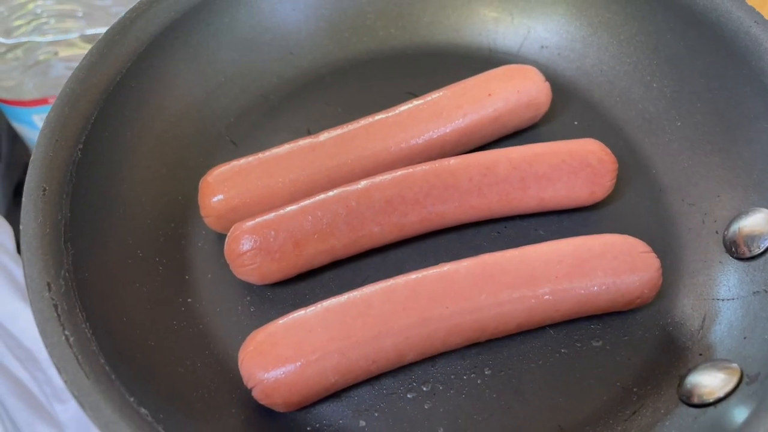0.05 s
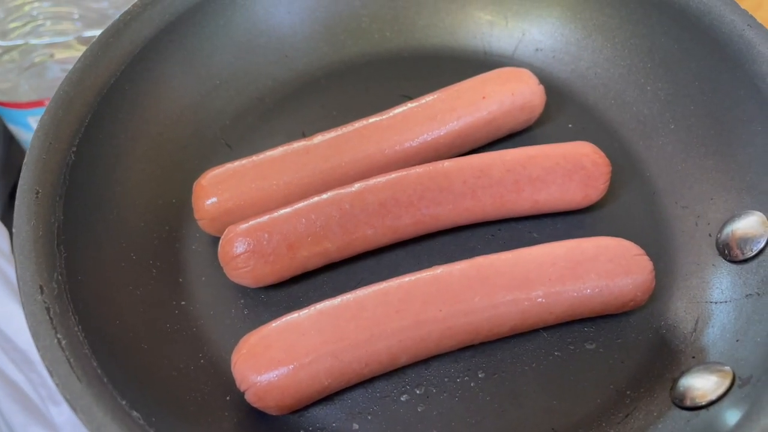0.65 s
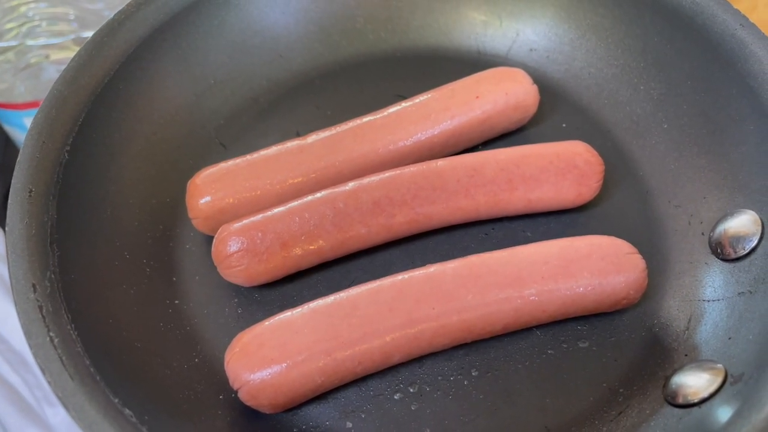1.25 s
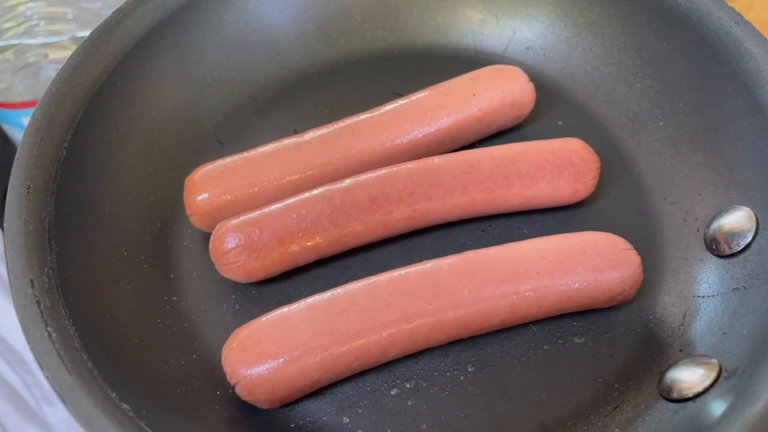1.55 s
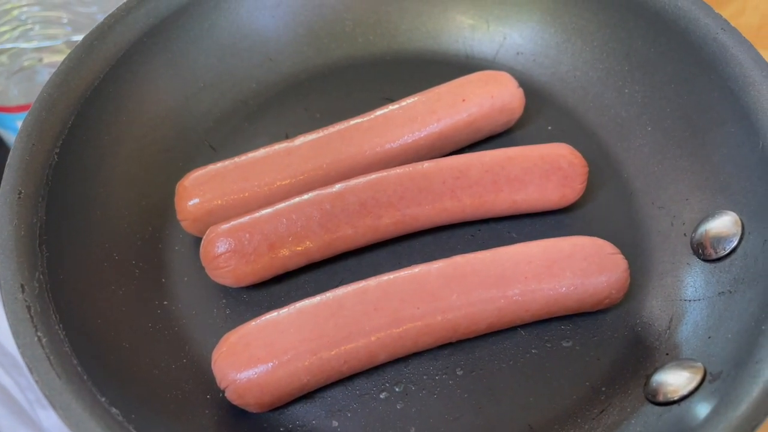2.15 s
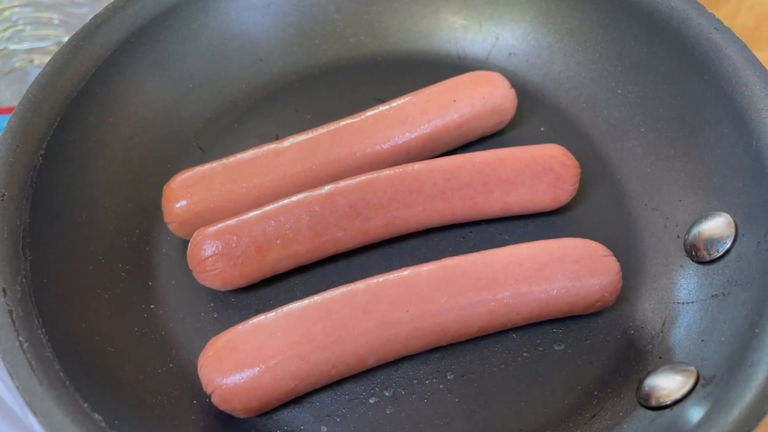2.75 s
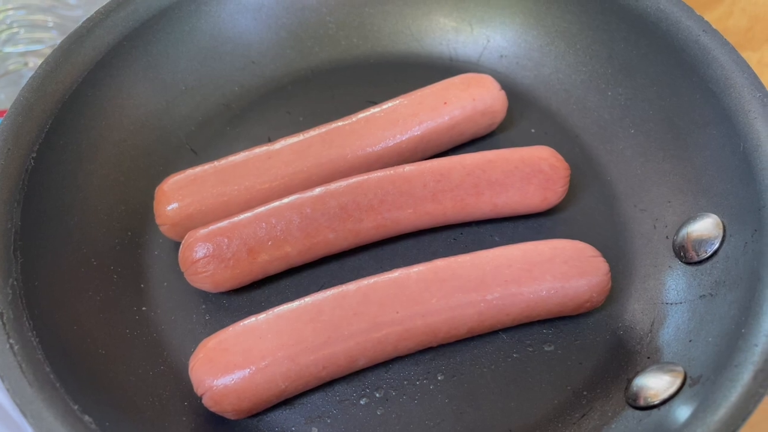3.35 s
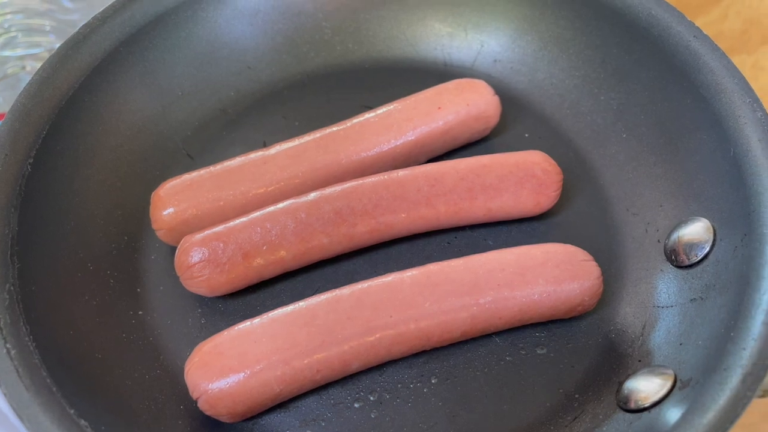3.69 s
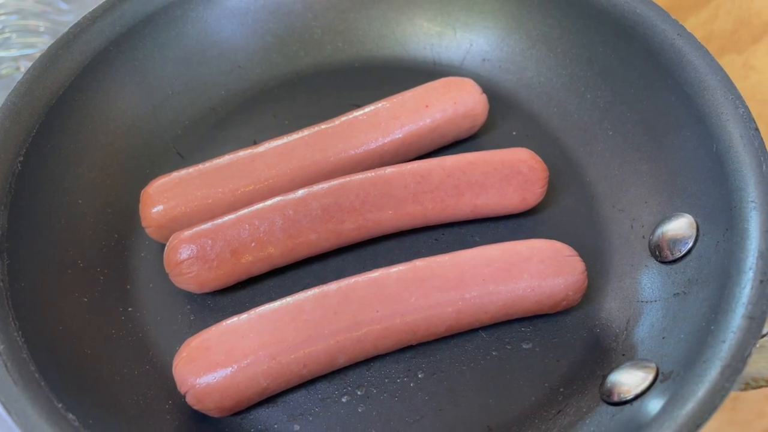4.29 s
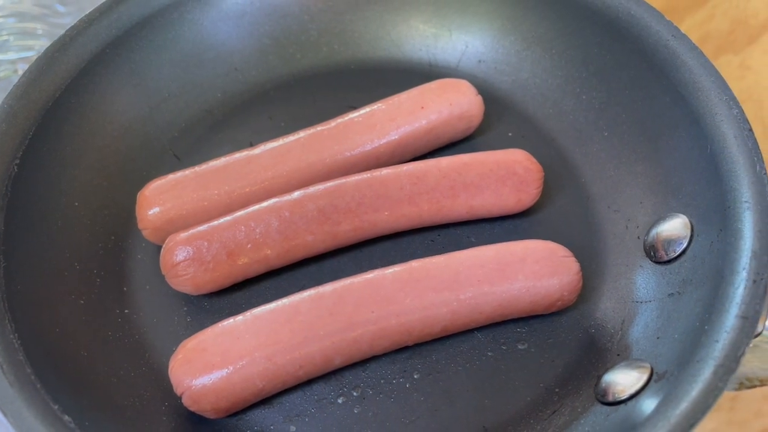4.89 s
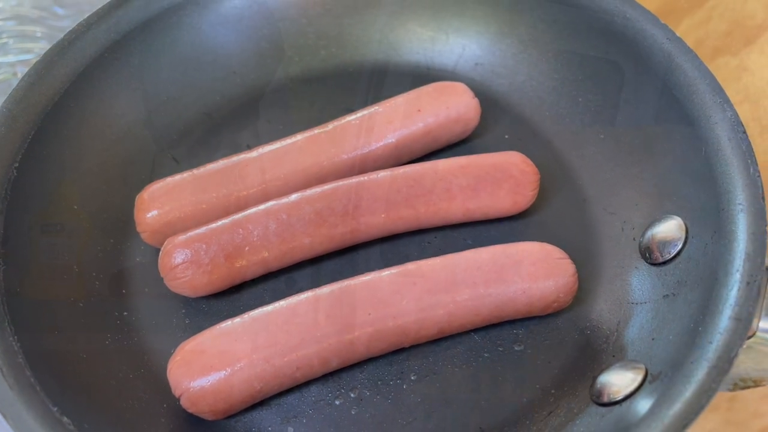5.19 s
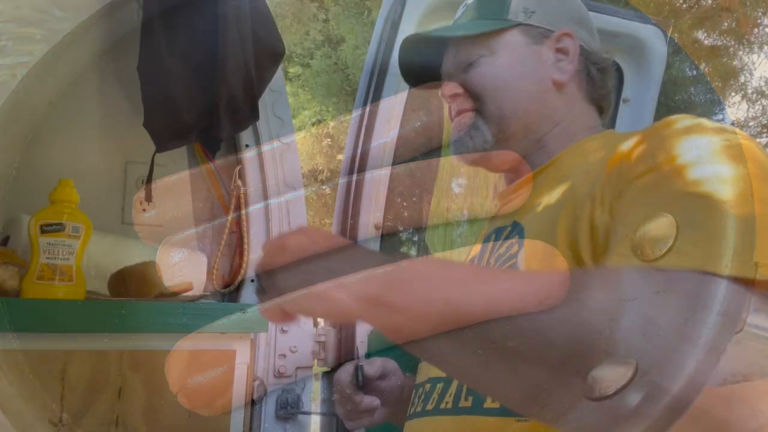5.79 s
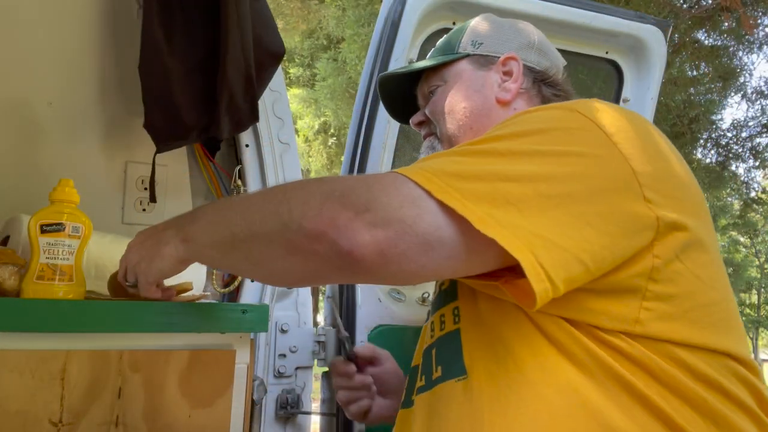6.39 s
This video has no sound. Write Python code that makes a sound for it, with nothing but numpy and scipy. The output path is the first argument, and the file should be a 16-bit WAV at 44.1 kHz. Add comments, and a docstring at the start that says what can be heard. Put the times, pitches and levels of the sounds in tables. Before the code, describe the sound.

Outdoors, a gas camp stove roars steadily under a close frying pan of fizzing, popping sausages, while a low hum slowly dies away. A breeze builds into low, irregular thumps on the microphone. In the last second the frying dissolves, a single dull utensil tap sounds, and what remains is the more distant burner with faint trilling crickets.

```python
"""Sausages sizzle in a frying pan on a camp stove outdoors, heard from just above the pan. Bursting steam
bubbles excite the pan's resonances, and drops of water flash to steam in sharp spits. Turbulent
combustion roars beneath, a low hum slowly fades and a breeze buffets the microphone. Near the end a
utensil knocks as the sound dissolves to a spot beside a van, where the stove is softer and crickets
trill in the trees."""
import sys
import numpy as np
from scipy import signal
from scipy.fft import rfft, irfft
from scipy.io import wavfile
from scipy.ndimage import uniform_filter1d

SR = 44100
rng = np.random.default_rng(int(sys.argv[2]) if len(sys.argv) > 2 else 0)


def dump_mix(stems):
    """Bounce the given channels to the path in sys.argv[1] as a 16-bit WAV at rate SR."""
    frames = np.atleast_2d(stems).T  # one column per channel
    limited = np.clip(frames, -1, 1)  # hard clip at full scale
    pcm = np.round(limited * 32767).astype(np.int16)
    wavfile.write(sys.argv[1], SR, pcm)


N = 284004
T = np.arange(N) / SR
HZ = np.maximum(np.arange(N // 2 + 1) * SR / N, 1)
TOP_HZ = 15550  # upper band limit


def undb(db):
    """Amplitude ratio of a level in decibels."""
    return 10 ** (np.asarray(db) / 20)


def over_hz(table):
    """Interpolation of a table to every bin, on a logarithmic frequency axis."""
    hz, value = np.transpose(table)
    return np.interp(np.log(HZ), np.log(hz), value)


def colour(x, table):
    """Minimum-phase filtering: folding the cepstrum makes a (f/Hz, gain/dB) response causal."""
    cepstrum = irfft(np.log(undb(over_hz(table))), N)
    cepstrum[1:N // 2] *= 2
    cepstrum[N // 2 + 1:] = 0
    return irfft(rfft(x) * np.exp(rfft(cepstrum)), N)


def level(x, db):
    """Normalisation to an rms level."""
    return x * undb(db) / np.sqrt(np.mean(x ** 2))


def lean(x, db):
    """Level difference between channels: left exceeds right by db."""
    return x * undb(np.array([[db], [-db]]) / 2)


def ramp(start_s, length_s):
    """Linear rise from 0 to 1."""
    return np.clip((T - start_s) / length_s, 0, 1)


def walk(rate_hz):
    """Slow random fluctuation: low-pass Gaussian noise of unit rms."""
    return level(irfft(rfft(rng.standard_normal(N)) * np.exp(-(HZ / rate_hz) ** 2), N), 0)


def stereo_noise(side_db, apart_hz):
    """Partial coherence: the channels are alike in the bass and uncorrelated above apart_hz."""
    mid, side = rng.standard_normal((2, N))
    side = irfft(rfft(side) * np.minimum(undb(side_db) + HZ / apart_hz, 1), N)
    return np.array([mid + side, mid - side])


# Phase lead of the microphone's left port over its right: f/Hz, phase/rad
PORT_LEAD = [(100, 0), (1700, .4), (2100, .9), (3300, .9), (3900, .2), (5300, .9), (6200, -.4),
             (7000, -1.4), (7700, -2.9), (8900, -3.4), (9650, -4.6), (10900, -6.2), (12400, -6.4),
             (13100, -7.7), (13800, -8.8), (14500, -9.4), (15700, -9.5)]
# Level of the left port relative to the right: f/Hz, level/dB
PORT_LEVEL = [(500, -1), (1500, 3), (2500, 4.5), (4000, 2.5), (6000, 3), (7600, 0)]


def ports(x):
    """Phase and level differences: the pan's sound reaches the two microphone ports out of step."""
    half = undb(over_hz(PORT_LEVEL) / 2) * np.exp(.5j * over_hz(PORT_LEAD))
    return irfft(rfft(x) * np.array([half, 1 / half]), N)


def bursts(per_s, spread_db, cap_db):
    """Poisson process: steam bubbles burst independently, very many small and a few large."""
    size_db = np.minimum(spread_db * rng.exponential(size=N), cap_db)
    return (rng.random(N) < per_s / SR) * undb(size_db) * rng.choice([-1, 1], N)


def scatter(clicks, decay_s, wall_db, size=600, shared_above_hz=6800):
    """Scattering: each click arrives directly, then as a short smear from the pan's wall."""
    tails = rng.standard_normal((3, size)) * np.exp(-T[:size] / decay_s)  # left, right, shared
    tails = rfft(tails * undb(wall_db) / np.sqrt(np.sum(tails ** 2, axis=1, keepdims=True)), N)
    unshared = .2 + .8 / (1 + (HZ / shared_above_hz) ** 20)
    response = 1 + np.sqrt(unshared) * tails[:2] + np.sqrt(1 - unshared) * tails[2]
    # the wall spreads the energy in time without adding any
    response /= np.sqrt(uniform_filter1d(np.abs(response) ** 2, size=3000, axis=1))
    return irfft(rfft(clicks) * response, N)


# Modes of the pan: f/Hz, half-width/Hz, level/dB
PAN_MODES = [(960, 50, -3), (1470, 70, 1), (1640, 60, -1), (2580, 60, 1), (2770, 60, -.5), (3060, 130, -4),
             (3700, 260, -5), (4800, 140, -8), (5350, 180, -4), (7400, 250, -9)]


def pan_ring(x):
    """Modal resonance: the pan answers each pop at its natural frequencies."""
    modes = sum(undb(db) / (1 + 1j * (HZ - hz) / width) ** 2 for hz, width, db in PAN_MODES)
    return irfft(rfft(x) * modes, N)


def boil(steady_db=1.5, cool_db=-2, warm_up_s=.44, surge_db=.88):
    """Exponential approach to a steady state: the gain rises as the fat heats, with random surges."""
    return undb(steady_db + cool_db * np.exp(-T / warm_up_s) + surge_db * walk(2))


# Spectrum of the crackling fat as the pan colours it: f/Hz, level/dB
FAT_SPECTRUM = [(400, -24), (1000, -7), (1500, -.3), (1850, -8), (2220, -4.2), (2380, -5), (2600, -2.2),
                (3200, -2.6), (3700, -1.4), (4400, -3.2), (5300, -3.5), (6900, -3), (8200, -5.2),
                (9600, -4.4), (12000, -6), (13000, -7.3), (14400, -8), (15500, -11)]


def sizzle(bubble_sizes=10):
    """Shot noise: bubbles fizz at a pitch set by size, bursting films tick, and both ring the pan."""
    pitches = np.geomspace(1100, 14000, bubble_sizes)
    bands = np.exp(-(np.log2(HZ / pitches[:, None]) / .6) ** 2) + 1e-3
    bands /= np.sqrt(np.sum(bands ** 2, axis=0))
    fizz = 0
    for hz, band in zip(pitches, bands):
        per_s = (1500 + .12 * hz) * undb(1.1 * walk(35))  # small, high bubbles are the most numerous
        pops = level(bursts(per_s, spread_db=4.2, cap_db=15.5), 0)
        fizz += scatter(irfft(rfft(pops) * band, N), decay_s=.0007, wall_db=-.5)
    ticks = 0
    for _ in range(3):
        films = bursts(450 * undb(1.4 * walk(25)), spread_db=4.2, cap_db=14)
        ticks += scatter(films, decay_s=.0005, wall_db=0)
    fat = level(fizz, 0) + level(ticks, -5)
    crackle = level(colour(fat, FAT_SPECTRUM), -18.8)
    ringing = level(pan_ring(fat), -36.8)
    return ports(crackle + ringing) * boil()


def squeaks(count=900, size=1500):
    """Damped oscillation: steam squeezing out from under the skins makes tiny gliding tones."""
    out, t = np.zeros((2, N + size)), T[:size]
    for when, pitch, length, glide, loud, side in rng.random((count, 6)):
        hz, decay_s = 2400 * 4.5 ** pitch, .0015 * 4 ** length
        phase = 2 * np.pi * hz * t * (1 + 3 * (glide - .5) * t)
        ring = np.sin(phase) * np.exp(-t / decay_s)
        i = int(when * N)
        out[:, i:i + size] += lean(ring, 8 * (side - .4)) * undb(3.4 * loud ** 3)
    return ports(level(out[:, :N], -31.5))


# Spectrum of the flame at first, from where the microphone starts over the pan: f/Hz, level/dB
EARLY_FLAME_SPECTRUM = [(50, -18), (105, -6), (145, -0.5), (228, -6.5), (290, -5), (345, -6), (420, 0),
                        (510, -1.2), (610, -7.5), (740, -6.5), (820, -15.5), (950, -11), (1120, -19),
                        (1600, -17.5), (2000, -31), (6000, -105)]
# Spectrum of the flame once the microphone has drifted over the pan: f/Hz, level/dB
LATE_FLAME_SPECTRUM = [(50, -19.5), (110, -8), (160, 1.7), (235, -5.5), (290, -4), (345, -5),
                       (440, -3.5), (520, -3), (600, -4.5), (710, -5.5), (820, -13.5), (950, -11.5),
                       (1150, -16), (1600, -15), (2000, -37.5), (6000, -95)]


def flame():
    """Combustion noise: turbulent gas excites the gap under the pan; its colour shifts as the microphone drifts
    over the pan, then the roar eases."""
    gas = stereo_noise(side_db=-18.5, apart_hz=14000)
    early = level(colour(gas, EARLY_FLAME_SPECTRUM), -15.5)
    late = level(colour(gas, LATE_FLAME_SPECTRUM), -15)
    drifted = ramp(start_s=.49, length_s=.55)
    roar = (1 - drifted) * early + drifted * late
    ease_db = -ramp(start_s=2.32, length_s=.32)
    flutter_db = .5 * walk(14)
    return lean(roar, -.77) * undb(ease_db + flutter_db)


def hum(hz=53.8, base_db=-20.5, fall_db_per_s=1.05):
    """Slow modulation: a low tone wavers in pitch and level, swells once and dies away."""
    phase = 2 * np.pi * np.cumsum(hz + .45 * walk(2.4)) / SR
    swell_db = 5 * np.exp(-((T - .55) / .58) ** 2)
    db = base_db - fall_db_per_s * T + swell_db + .8 * walk(5)
    return lean(level(np.sin(phase), 0) * undb(db), -.8)


def eddies(spectrum, size):
    """Turbulent pressure at the microphone, held near unit rms over windows of size samples."""
    air = colour(stereo_noise(side_db=-13, apart_hz=5000), spectrum)
    return air / np.sqrt(uniform_filter1d(np.mean(air ** 2, axis=0), size=size))


# Spectrum of steady airflow on the microphone: f/Hz, level/dB
BREEZE_SPECTRUM = [(20, -33), (35, -14), (50, -3), (68, 0), (100, -9), (170, -16), (280, -24), (600, -40),
                   (2500, -80)]
# Spectrum of the turbulence in a gust: f/Hz, level/dB
PUFF_SPECTRUM = [(20, -33), (45, -8), (75, -2), (110, -2), (180, -4), (290, -8), (420, -22), (600, -33),
                 (2500, -80)]
# Gusts on the microphone: t/s, buffet f/Hz, buffet peak level/dB, turbulence level/dB
WIND_GUSTS = [(3.165, 60, -10, -25), (3.285, 120, -11, -22), (3.308, 68, -10, -23), (3.48, 88, -7, -17),
              (3.624, 76, -13, -27), (3.745, 72, -9, -26), (3.886, 85, -6.5, -20), (3.951, 90, -4.5, -18),
              (4.018, 150, -9, -17), (4.036, 78, -1, -16), (4.058, 56, -7, -19), (4.175, 102, -4.5, -19),
              (4.233, 80, -10, -21), (4.285, 54, -12, -26), (4.332, 100, -11.5, -25), (4.71, 90, -10, -25),
              (5.007, 115, -11, -23), (5.136, 105, -10.5, -25), (5.234, 68, -4.5, -17),
              (5.27, 105, -9, -19), (5.376, 230, -10, -18), (5.394, 68, -5.5, -14), (5.524, 140, -8, -24),
              (5.553, 98, -3.5, -21), (5.9, 62, -16, -29), (6.19, 76, -9.5, -25), (6.342, 78, -11.5, -28)]


def wind(calm_db=-24.5, breeze_db=-20, sag_s=.06, width_cycles=.9, puff_width_s=.02):
    """Flow noise: a breeze gets up; each gust is a pressure swing of falling pitch in a turbulent puff."""
    breeze = undb(calm_db + (breeze_db - calm_db) * ramp(start_s=1.2, length_s=1.9))
    buffets, puffs = 0, 0
    for (s, hz, peak_db, puff_db), offset in zip(WIND_GUSTS, rng.random(len(WIND_GUSTS))):
        cycles = hz * sag_s * (1 - np.exp(-np.clip(T - s, -.5, .5) / sag_s))
        swell = np.exp(-.5 * ((T - s) * hz / width_cycles) ** 2)
        buffets += undb(peak_db) * swell * np.sin(2 * np.pi * (cycles + offset))
        puffs += undb(puff_db) * np.exp(-.5 * ((T - s) / puff_width_s) ** 2)
    rumble = eddies(BREEZE_SPECTRUM, size=9000) * breeze
    return rumble + eddies(PUFF_SPECTRUM, size=1000) * puffs + buffets


# The loudest spits of fat: t/s, energy level/dB, snap f/Hz, bubble ring f/Hz
FAT_SPITS = [(0.0161, 7, 8600, 11000), (0.1244, 8.5, 4000, 2800), (0.1432, 4.5, 6700, 5120),
             (0.3987, 5.5, 7400, 8870), (0.4700, 6, 7000, 11630), (0.6711, 6, 7000, 7540),
             (0.8310, 5.5, 10500, 12000), (1.1470, 5, 3600, 2930), (1.2736, 7, 7500, 3320),
             (1.5590, 6.5, 10200, 9820), (1.6981, 6.5, 8600, 9000), (2.1972, 6.5, 6900, 6550),
             (2.3020, 6.5, 11600, 11150), (2.3741, 5.5, 5000, 5340), (2.4276, 5, 8900, 9000),
             (2.6282, 6.2, 7000, 9950), (2.6528, 8.5, 10000, 11410), (2.7415, 7.5, 9000, 11020),
             (3.0757, 8, 7500, 14430), (3.4199, 5, 5800, 8010), (3.5470, 7, 5900, 5680),
             (3.6536, 6, 6300, 5000), (3.6953, 6.5, 5600, 2670), (4.2008, 4.5, 3600, 2840),
             (4.6989, 10, 6900, 8350), (4.7540, 5, 12200, 13000), (5.0472, 7.5, 4100, 2760),
             (5.1440, 6.5, 4000, 3700), (5.2808, 6, 8700, 9860), (5.3536, 7.5, 7000, 8140),
             (5.4455, 5, 9000, 8350), (5.4937, 7.5, 8500, 5860), (5.6631, 5, 9000, 9500)]


def spits(size=600, rise_s=.0007, ring_decay_s=.002, ring_share=.3):
    """Flash boiling: a water drop turns to steam with a snap and a ring, higher for a smaller drop."""
    out, t = np.zeros(N), T[:size]
    age = t / rise_s
    for s, db, hz, ring_hz in FAT_SPITS:
        band = signal.butter(1, [hz / 3, min(hz * 1.7, TOP_HZ)], "band", fs=SR)
        snap = signal.lfilter(*band, rng.standard_normal(size) * age * np.exp(-age))
        ring = np.sin(2 * np.pi * ring_hz * t) * (1 - np.exp(-age)) * np.exp(-t / ring_decay_s)
        spit = np.sqrt(1 - ring_share) * level(snap, 0) + np.sqrt(ring_share) * level(ring, 0)
        i = int(s * SR)
        out[i:i + size] += undb(db) * spit / np.linalg.norm(spit)
    return ports(out)


# Spectrum of the stove from beside the van: f/Hz, level/dB
FAR_STOVE_SPECTRUM = [(60, -10.5), (110, -20), (175, -1), (245, -1.5), (315, -14), (420, -5.8), (530, -5.5),
                      (680, -10.3), (900, -18.8), (1190, -18.5), (1275, -11), (1390, -23), (1690, -25),
                      (1800, -18.5), (1950, -26), (4500, -30), (7000, -34), (9500, -31), (10600, -37),
                      (12200, -34.5), (15000, -37)]


def stove_afar():
    """Combustion and jet noise: the flame's roar and the gas jet's hiss, softer a few steps away."""
    gas = stereo_noise(side_db=-7, apart_hz=5300)
    roar = level(colour(gas, FAR_STOVE_SPECTRUM), -19.5) * undb(.41 * walk(31))
    return lean(roar, 1.3)


# Cricket choruses: f/Hz, half-width/Hz, base level/dB, left minus right level/dB, swell t/s
CHORUSES = [(3570, 130, -37.8, -3, 6.1), (5270, 100, -42.5, -2, 6.08), (5680, 180, -36, 2, 6.3),
            (7950, 240, -39, 0, 6.08), (8900, 800, -42, 0, 6.25)]


def cricket_chorus(trill_hz=48, trill_db=1.8, wander_hz=28):
    """Incoherent summation: many far crickets blur into trilling noise bands that wander and swell."""
    out = 0
    for hz, width, db, lean_db, swell_s in CHORUSES:
        blur = irfft(rfft(rng.standard_normal((2, 2, N))) / (1 + (HZ / width) ** 2), N)
        phase = 2 * np.pi * np.cumsum(hz + wander_hz * walk(22)) / SR
        band = blur[0] * np.cos(phase) + blur[1] * np.sin(phase)
        trill = np.sin(2 * np.pi * np.cumsum(trill_hz * undb(2 * walk(9.4))) / SR)
        swell_db = 4 * np.exp(-((T - swell_s) / .12) ** 2) - 2.5
        out += lean(level(band, db), lean_db) * undb(swell_db + trill_db * trill + 2 * walk(13))
    return out


# Pulses of a nearer cricket's chirp: t/s, level/dB
CHIRP_PULSES = [(6.154, -29), (6.183, -33)]


def cricket_calls(hz=3540, call_s=5.83, period_s=.2, call_width_s=.018, call_db=-37.5):
    """Pulse modulation of a tone: one cricket keeps time and a nearer one chirps once."""
    chirp = sum(undb(db) * np.exp(-((T - s) / .0048) ** 2) for s, db in CHIRP_PULSES)
    from_call = (T - call_s + period_s / 2) % period_s - period_s / 2
    calls = undb(call_db) * np.exp(-(from_call / call_width_s) ** 2)
    return np.sqrt(2) * (chirp + calls) * np.sin(2 * np.pi * hz * T)


# Light knock of a utensil: t/s, peak level/dB
UTENSIL_KNOCK = [(5.68, -3)]


def knock(width_s=.0032):
    """Impact noise: a utensil's brief contact gives a dull tap with a broad spectrum."""
    s, db = UTENSIL_KNOCK[0]
    blow = stereo_noise(side_db=-8, apart_hz=9000) * np.exp(-((T - s - .003) / width_s) ** 2)
    tap = colour(blow, [(200, -2), (700, 2), (2000, -2), (3500, -1), (6000, -7), (15000, -11)])
    return tap / np.abs(tap).max() * undb(db)


def scene(leave_s=5.5, step_db=-5.5):
    """Superposition: the close sound steps down and fades out as the spot beside the van fades in."""
    near = undb(step_db * (T > leave_s)) * (1 - ramp(leave_s, length_s=.62))
    far = ramp(start_s=5.45, length_s=.55)
    above_pan = sizzle() + squeaks() + spits() + flame() + hum()
    beside_van = stove_afar() + cricket_chorus() + cricket_calls()
    return near * above_pan + far * beside_van + knock() + wind()


def record(dry):
    """Clipping and band limiting: the rare highest peaks are flattened and the top is cut steeply."""
    return irfft(rfft(np.clip(dry, -1, 1)) / np.sqrt(1 + (HZ / TOP_HZ) ** 400), N)


dry = scene()
out = record(dry)
dump_mix(out)
```